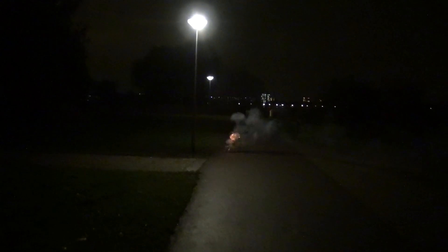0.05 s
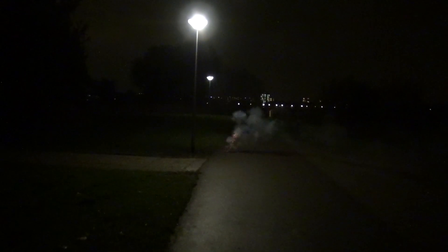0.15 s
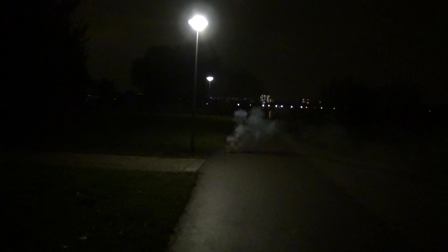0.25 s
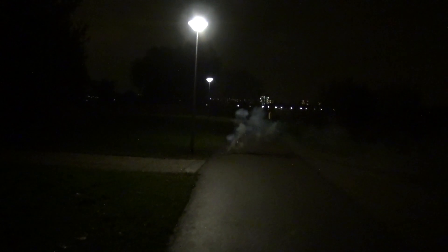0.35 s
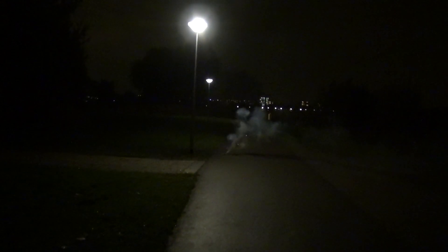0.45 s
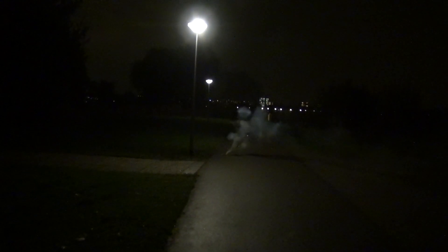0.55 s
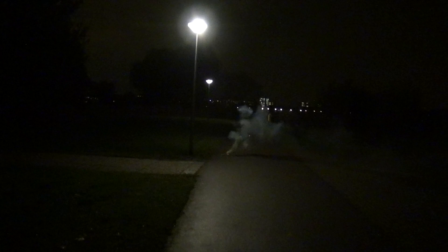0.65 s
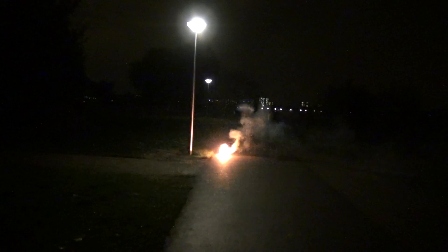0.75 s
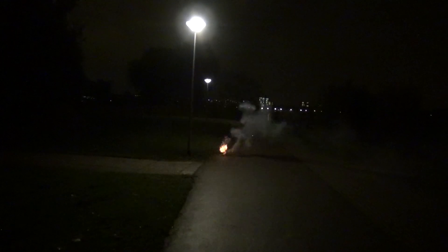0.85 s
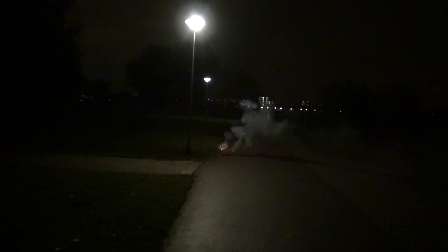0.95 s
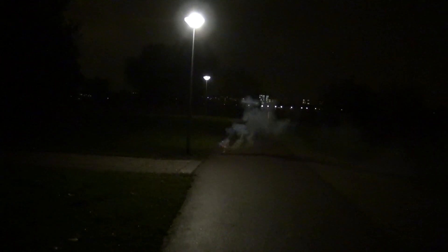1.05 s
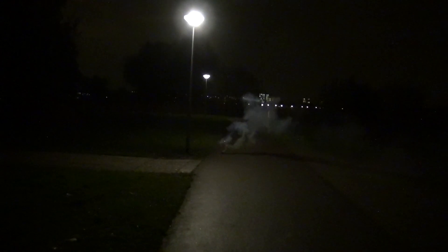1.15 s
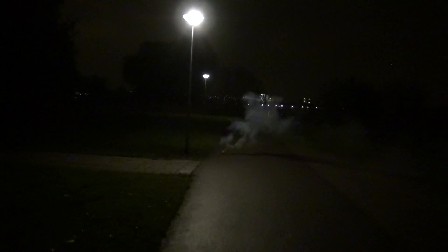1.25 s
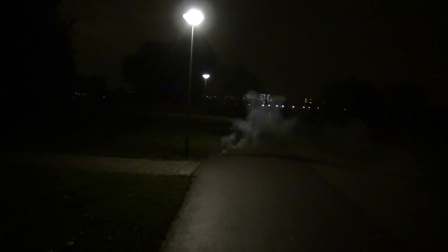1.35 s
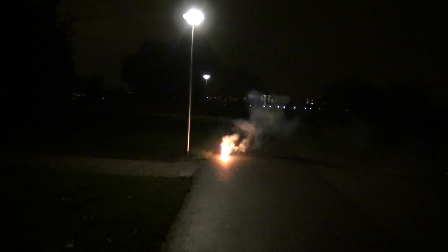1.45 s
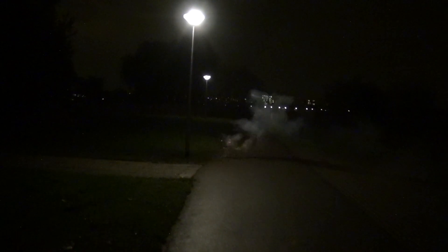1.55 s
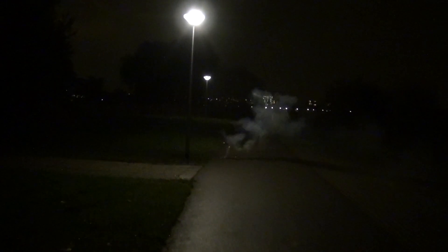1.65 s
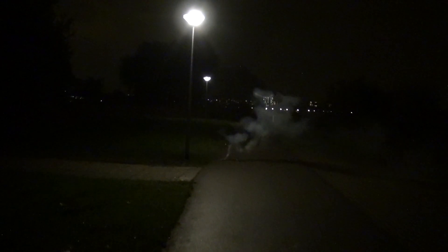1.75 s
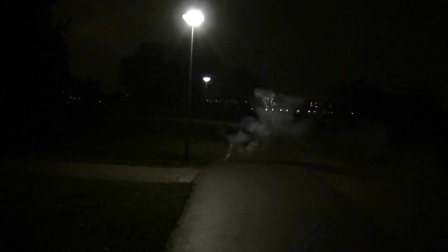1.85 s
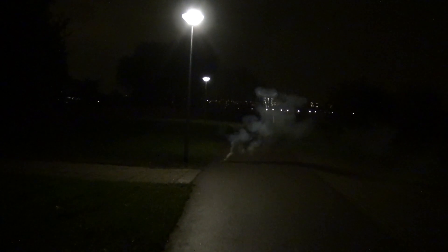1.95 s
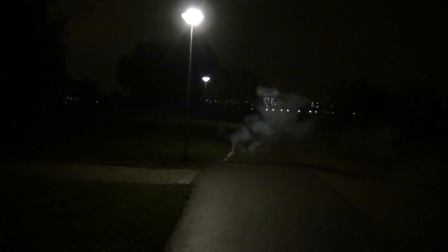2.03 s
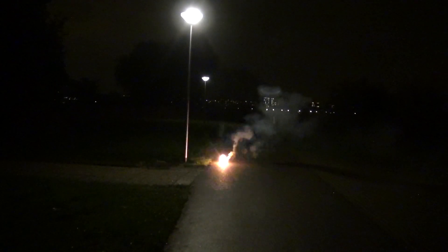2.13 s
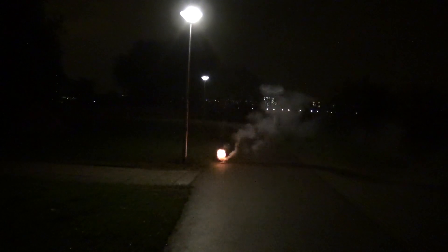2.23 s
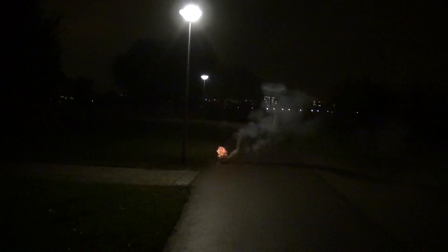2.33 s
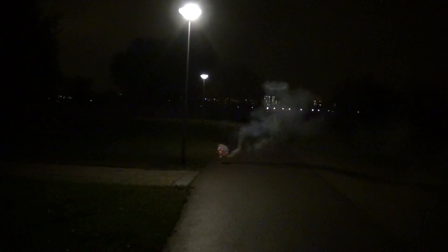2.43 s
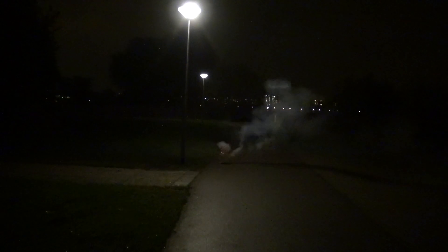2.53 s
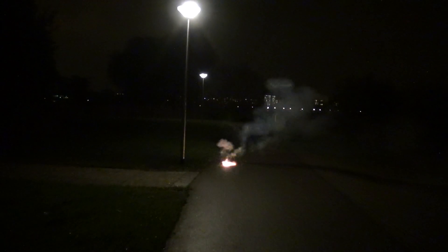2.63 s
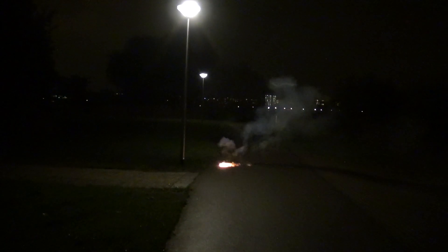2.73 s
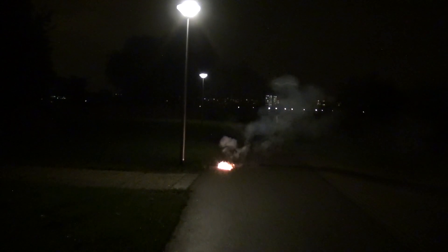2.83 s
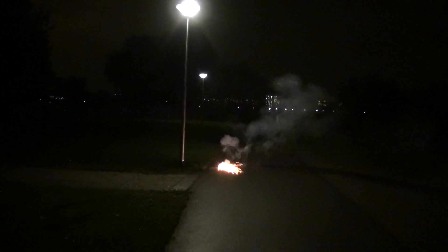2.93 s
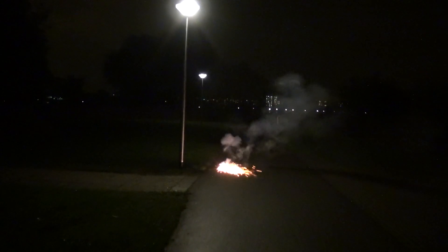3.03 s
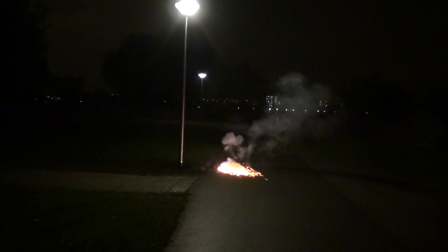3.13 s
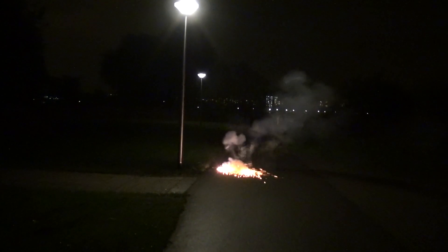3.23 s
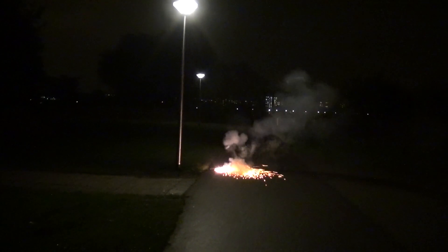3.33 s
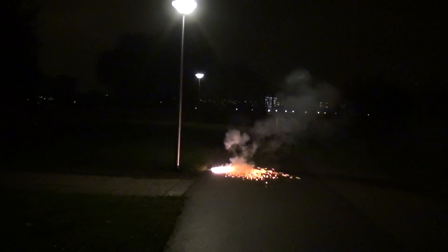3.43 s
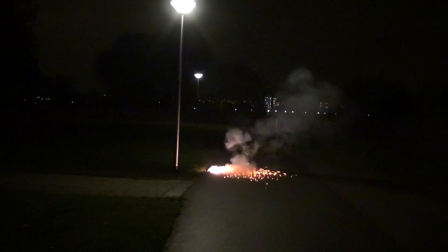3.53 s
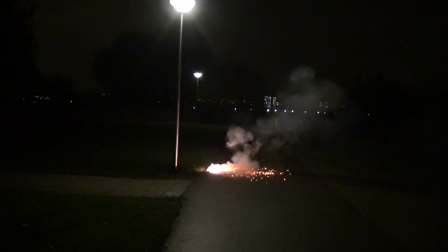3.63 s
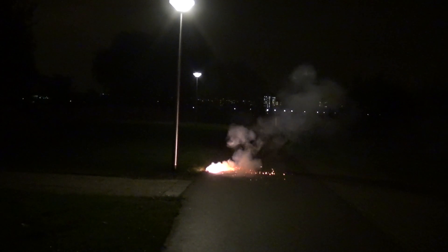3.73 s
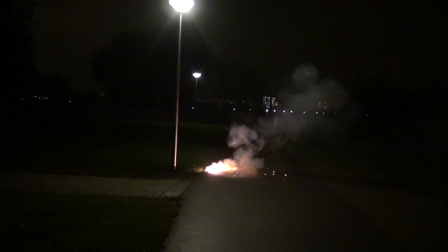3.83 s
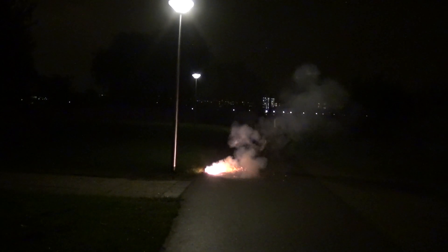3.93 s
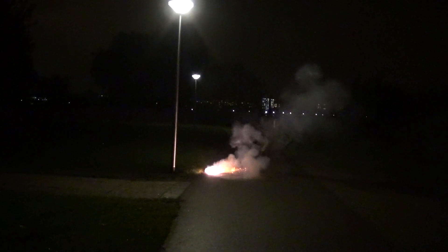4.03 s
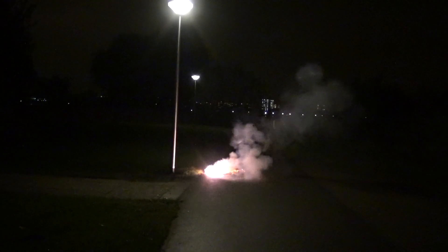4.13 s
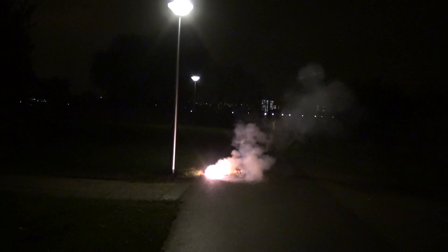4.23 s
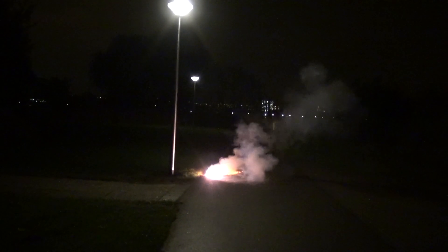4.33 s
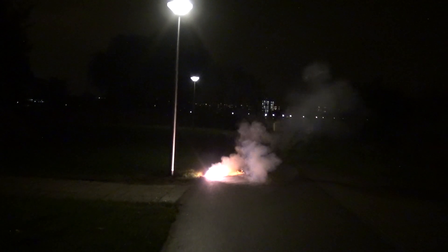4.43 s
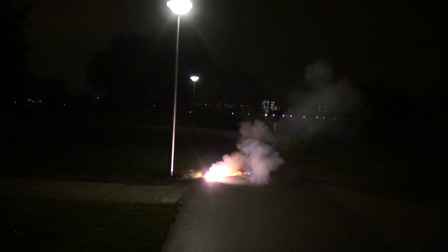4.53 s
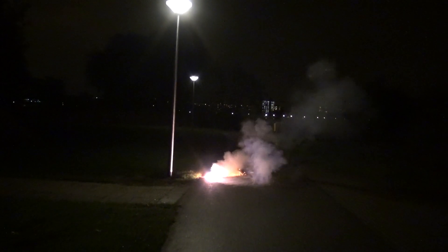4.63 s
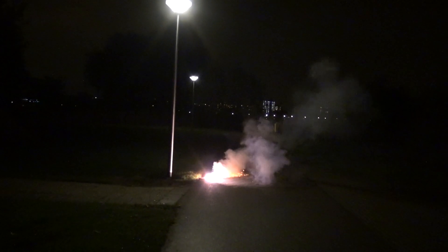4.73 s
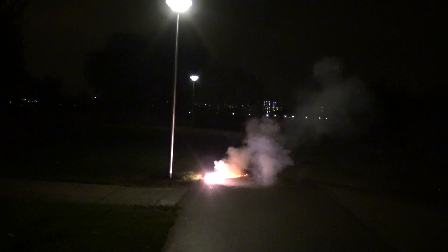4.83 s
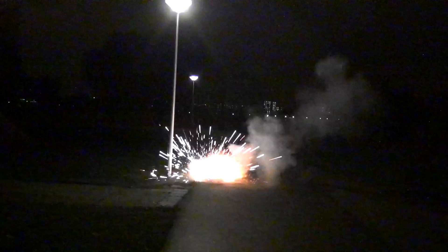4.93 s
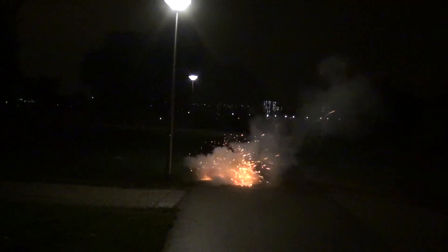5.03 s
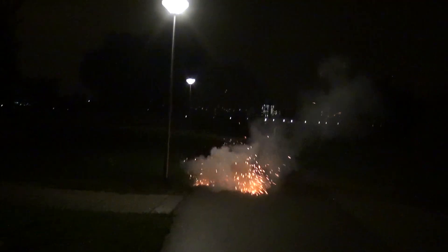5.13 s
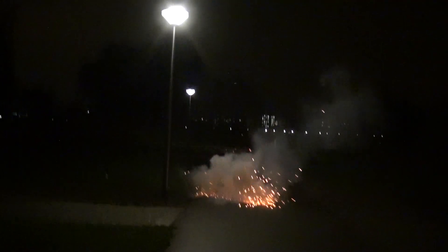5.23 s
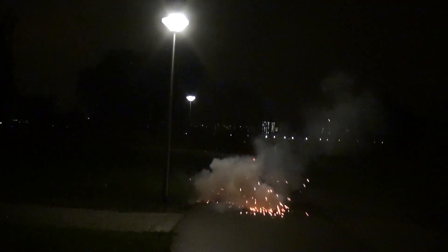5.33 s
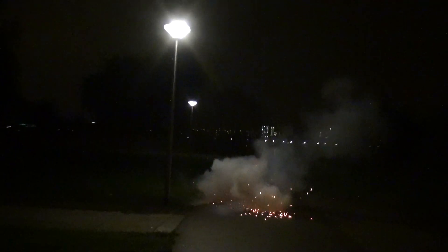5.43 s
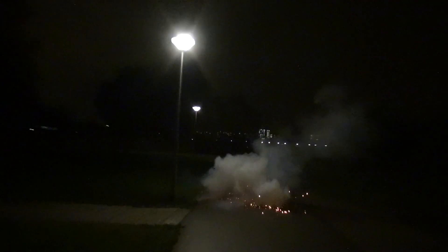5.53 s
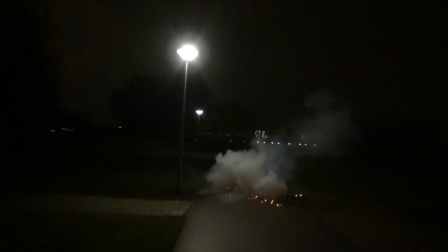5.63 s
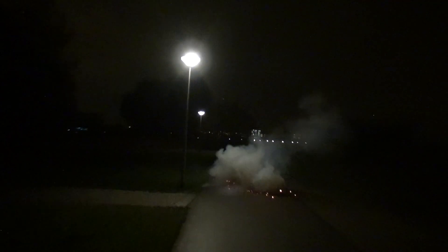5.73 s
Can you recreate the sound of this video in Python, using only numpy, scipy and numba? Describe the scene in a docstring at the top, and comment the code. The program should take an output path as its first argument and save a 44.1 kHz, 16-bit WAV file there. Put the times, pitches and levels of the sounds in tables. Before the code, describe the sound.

Firecracker on a paved path, heard from some distance by a stereo microphone. Isolated hard cracks slap off lamp posts, trees and far houses; the last lights a short roaring spray with crisp hissing sparks. The spray sinks to near silence, with tiny spits and a distant bird yelp, before one enormous distorted bang with a dense, loud, rolling reverberation fading into soft town rumble.

```python
"""Firecracker in a park at night

Sharp cracks, the first just before the start so that only its echoes are heard; a roaring spray; one huge blast.
Each bang is a pressure pulse run through echoes of lamp posts, trees and far houses; the spray is coloured noise.
A town of filtered noise hums behind, and a waterbird of falling tones calls twice in the distance.
A limiter too slow for the shock fronts lets them clip, and holds the long rolling echo of the blast at full level."""
import sys
import numpy as np
from scipy import signal
from scipy.fft import rfft, irfft, next_fast_len
from scipy.io import wavfile
from scipy.ndimage import uniform_filter1d
from numba import njit

SR = 44100
rng = np.random.default_rng(int(sys.argv[2]) if len(sys.argv) > 2 else 0)


def digitize_waveform(pressure):
    """Quantize a signal to 16-bit integers and store it at the path in sys.argv[1].

    Rows of a 2-D input are taken as channels; values are limited to [-1, 1].
    """
    field = np.atleast_2d(pressure).T
    bounded = np.clip(field, -1, 1)
    quanta = np.round(bounded * 32767).astype(np.int16)
    wavfile.write(sys.argv[1], SR, quanta)


N = 254898
T = np.arange(N) / SR

# bangs: (time [s], shock level [dB], overpressure length [ms], gas puff level [dB], casing tear level [dB])
BANGS = [(-0.0595, 23.5, 0.14, 3, -16), (0.8220, 28, 0.15, -5, -6), (1.5223, 20.5, 0.25, 15, -9),
         (2.2240, 28, 0.13, 7.5, -25), (2.7198, 14.5, 0.37, -11.5, -5), (4.9968, 53, 0.69, 50, -25)]


def undb(db):
    """Decibels to gain."""
    return 10 ** (np.asarray(db) / 20)


def butter(x, hz, kind, order=2):
    """Causal Butterworth low-pass or high-pass."""
    return signal.sosfilt(signal.butter(order, min(hz, SR * .45), kind, fs=SR, output="sos"), x)


def colour(x, points):
    """Filter by a spectrum of (frequency [Hz], level [dB]), interpolated over log frequency."""
    hz, db = np.transpose(points)
    size = next_fast_len(x.shape[-1] + 4096)
    f = np.maximum(np.fft.rfftfreq(size, 1 / SR), 1)
    gain = undb(np.interp(np.log(f), np.log(hz), db))
    return irfft(rfft(x, size) * gain, size)[..., :x.shape[-1]]


def pan(left_db):
    """Gains of the two channels for a left-minus-right level difference."""
    return undb(np.array([[left_db], [-left_db]]) / 2)


def wide_noise(size, width, bass_width=0.29, split_hz=3200):
    """Stereo white noise; close microphones hear nearly the same bass, so its side part is set apart."""
    mid, side = rng.standard_normal((2, size))
    bass_side = bass_width * butter(side, split_hz, "low", order=1)
    treble_side = width * butter(side, split_hz, "high", order=1)
    return mid + (bass_side + treble_side) * np.array([[1], [-1]])


def unit(x):
    """Scale to rms 1."""
    return x / np.sqrt(np.mean(x ** 2))


def walk(rate_hz):
    """Slow random curve of rms near 1: held random steps, smoothed over one step."""
    k = int(SR / rate_hz)
    steps = np.repeat(rng.standard_normal(N // k + 1), k)
    return unit(uniform_filter1d(steps, k)[:N])


def hump(centre_s, half_s):
    """Gaussian swell and ebb, 1 at its centre."""
    return np.exp(-((T - centre_s) / half_s) ** 2)


def add(out, x, start_s):
    """Mix x into out from a given time, cropping at both ends."""
    i = int(round(start_s * SR))
    x = x[..., max(-i, 0):out.shape[-1] - i]
    out[:, max(i, 0):max(i, 0) + x.shape[-1]] += x


def bangs(low_hz=78, front_hz=12500, puff_ms=0.58, puff_hz=380, tear_s=0.0015, tear_hz=3000,
          rattle_db=-30, rattle_s=0.0014, rattle_hz=1050):
    """The casing rips for a few ms around each shock front; the front and a slower puff of gas run through the park."""
    out, t = np.zeros((2, N)), T[:SR // 10]
    for start_s, db, push_ms, puff_db, tear_db in BANGS:
        shock = undb(db) * butter(blast_wave(push_ms), front_hz, "low", order=1)
        puff = undb(puff_db) * butter(blast_wave(puff_ms), puff_hz, "low")
        wave = butter(shock + puff, low_hz, "high", order=3)  # the deepest bass swings out slowly
        paths = park()
        # the paving around the cracker throws the front back within the first few ms
        rattle = butter(butter(rng.standard_normal(len(t)), rattle_hz, "low"), 257, "high")
        add(paths, undb(rattle_db) * unit(rattle) * np.exp(-t / rattle_s), 0)
        add(out, signal.fftconvolve(paths, wave[None]), start_s)
        tear = butter(butter(rng.standard_normal(len(t)), tear_hz, "low", order=1), 290, "high")
        middle_s = t[-1] / 2
        tear_envelope = np.exp(-abs(t - middle_s) / tear_s)
        add(out, undb(tear_db) * unit(tear) * tear_envelope, start_s - middle_s)
    return out


def blast_wave(push_ms):
    """A jump in pressure that falls through zero into a longer, weaker suction."""
    age = T[:SR // 10] * 1000 / push_ms
    return (1 - age) * np.exp(-age)


def park(mirror=0.84, patchy_db=1.5, echo_top_hz=5000, air_db_per_s=1.0, air_power=1.367):
    """Stereo response of the park: direct path, posts, smeared echoes and scatter, all but the direct dulled by air."""
    # lamp posts and path furniture: (lag [s], level [dB], highest reflected frequency [Hz])
    posts = [(.0033, -23, 9000), (0.0119, -16.5, 14100), (0.014, -27.5, 2200), (0.0226, -19.5, 3000)]
    # trunks and walls: (lag [s], level [dB], smear [ms], left minus right [dB], bass along the ground [dB])
    trunks = [(.036, -42, 4, -17, -15), (.0455, -23, 3, 16.5, -44), (0.0787, -26, 2.1, 2, -16.5),
              (0.084, -16.5, 2.6, 7, -5.5), (.146, -26, 7, 6.5, -36), (0.183, -25, 5.5, 5.5, -37),
              (.336, -67, 10, -15, -31.5)]
    # colour of the scatter, low mids cancelled by soft ground: (frequency [Hz], level [dB])
    grass = [(35, 2), (75, 10), (120, 3.5), (190, 2), (270, -4), (390, -3.5), (700, -1), (1400, 0.5),
             (2600, 2), (4500, 0), (8000, 2), (15000, -5)]
    # faces mirror mids and treble; the bass comes back as a thump
    echo_low_hz, thump_low_hz, thump_high_hz = 370, 122, 248
    roll_s, roll_lag_s = 0.024, 0.47  # from roll_lag_s on, the bass of an echo is more roll than thump
    size = int(1.2 * SR)
    t, click = T[:size], signal.unit_impulse(2048)

    # some twigs and trunks return far more than others
    swell = scatter_level(t) * undb(patchy_db * walk(500)[:size])
    paths = colour(wide_noise(size, echo_width(t)) * swell, grass) * pan(4)
    for lag_s, db, smear_ms, left_db, bass_db in trunks + houses():
        # a flat face mirrors the shock; the rough things around it smear it
        echo = (smear(lag_s, smear_ms / 1000) + mirror * click) / np.hypot(1, mirror)
        echo = butter(butter(echo, echo_low_hz, "high"), echo_top_hz, "low", order=1)
        thump = click + smear(lag_s, roll_s) * lag_s / roll_lag_s
        thump = butter(butter(thump, thump_low_hz, "high", order=3), thump_high_hz, "low", order=3)
        add(paths, (echo * undb(db) + thump * undb(bass_db)) * pan(left_db), lag_s)
    for lag_s, db, top_hz in posts:
        post = butter(butter(click, 790, "high", order=1), top_hz, "low", order=1)
        add(paths, undb(db) * post, lag_s)

    # air absorption: air_db_per_s at 1 kHz, growing as a power of frequency
    f, lags, spectra = signal.stft(paths, SR, nperseg=256)
    loss_db = air_db_per_s * np.outer((f / 1000) ** air_power, lags)
    paths = signal.istft(spectra * undb(-loss_db), SR)[1][:, :size]
    paths[:, 0] += 1  # direct path
    return paths


def scatter_level(t, rise_s=0.0051):
    """Each grove sets in when the shock reaches it, then fades at its own rate; powers add."""
    # lawn, near trees, far trees: (lag [s], level [dB], fade [dB/s])
    groves = [(0, -42.5, 494), (0.033, -46, 88), (0.312, -68, 47)]
    power = 0
    for lag_s, db, fade_db_per_s in groves:
        age = np.maximum(t - lag_s, 0)
        level = undb(db - fade_db_per_s * age) * (1 - np.exp(-age / rise_s))
        power = power + level ** 2
    return np.sqrt(power)


def houses(count=10, lag_s=.3595, step_s=.034, smear_ms=7.6, left_db=2.5,
           db=-34, step_db=-2.5, bass_db=-30, bass_step_db=-3.5):
    """Echoes of a far row of evenly spaced fronts, each later and weaker; same columns as trunks and walls."""
    return [(lag_s + k * step_s, db + k * step_db, smear_ms, left_db, bass_db + k * bass_step_db)
            for k in range(count)]


def echo_width(lag_s, width=1.0, narrow_s=0.12):
    """Stereo width by lag: near echoes come from all round, late ones from down the path."""
    return width / np.hypot(1, lag_s / narrow_s)


def smear(lag_s, fade_s):
    """A stereo burst of fading noise with the energy of one click."""
    t = T[:2048]
    rough = wide_noise(len(t), echo_width(lag_s)) * np.exp(-t / fade_s)
    return rough / np.sqrt(np.sum(rough ** 2) / 2)


def spray(flutter_db=1.28, sputter_db=0.9, flare_db=-34, flare_growth=2.6):
    """A fluttering jet of burning gas builds, then collapses to a smoulder; sparks hiss and spit on top."""
    # roar of the jet: (frequency [Hz], level [dB])
    roar_band = [(47, -30), (80, -8.5), (190, 0.5), (420, 1), (680, 0.5), (1250, -2.5), (2400, -14),
                 (4500, -27), (9000, -70)]
    # hiss of the sparks: (frequency [Hz], level [dB])
    hiss_band = [(1200, -29), (2800, -17), (5000, 6), (8000, 3.5), (11000, -1.5), (15500, -13)]
    # rasp of a strong spray: (frequency [Hz], level [dB])
    flare_band = [(900, -35), (2000, 2), (3200, 5), (5000, -2.5), (12000, -19)]
    # bursts of extra sparks: (time [s], half length [s], hiss level [dB])
    flare_ups = [(3.01, 0.08, -46), (3.354, 0.13, -43.5), (4.3, .06, -56)]
    # single sparks that spit: (time [s], level before a 3.5 dB cut and a high-pass [dB])
    spits = [(4.1007, -26), (4.708, -25.5)]
    light_s, spent_s, blast_s = 2.73, 3.359, BANGS[-1][0]
    jet_db, jet_growth, collapse_db_per_s = -23, 0.59, 73
    jet_hiss_db = -24.5  # relative to the jet
    smoulder_db, smoulder_hiss_db = -41.5, -56.5

    burning = np.interp(T, [light_s, light_s + .03, blast_s, blast_s + .01], [0, 1, 1, 0])
    burnt = np.clip((T - light_s) / (spent_s - light_s), 0, 1)
    jet = burnt ** jet_growth * undb(jet_db - collapse_db_per_s * np.maximum(T - spent_s, 0))
    roar = unit(colour(wide_noise(N, 0.21, bass_width=0.051), roar_band))
    roar = roar * np.hypot(jet, undb(smoulder_db)) * undb(flutter_db * walk(70))

    extra = sum(undb(db) * hump(centre_s, half_s) for centre_s, half_s, db in flare_ups)
    sparks = np.sqrt((jet * undb(jet_hiss_db)) ** 2 + extra ** 2 + undb(smoulder_hiss_db) ** 2)
    sputter = undb(sputter_db * walk(400))
    hiss = unit(colour(wide_noise(N, 0.18), hiss_band)) * sparks * sputter
    # a strong spray rasps lower as well as louder
    flare_level = undb(flare_db) * (sputter * sparks / sparks.max()) ** flare_growth
    flare = unit(colour(wide_noise(N, 0.083), flare_band)) * flare_level
    out = (roar + hiss + flare) * burning * pan(0.17)

    for start_s, db in spits:
        spit = wide_noise(SR // 20, 0.32) * np.exp(-T[:SR // 20] / 0.00084)
        add(out, undb(db - 3.5) * butter(spit, 4000, "high"), start_s)
    return out


def bird(fall=.22, glide_s=0.055, rasp=0.033, octave_db=-18, wet_db=-5, ring_s=0.06):
    """A waterbird's short yelp: a falling tone and its octave, hoarse by pitch jitter, blurred by the trees."""
    # calls: (time [s], level [dB], starting pitch [Hz])
    calls = [(1.036, -36.5, 1685), (4.21, -34.5, 1736)]
    out, t = np.zeros((2, N)), T[:SR // 4]
    opening = np.interp(t, [0, .018, .055, .09], [0, 1, .8, 0])
    for start_s, db, hz in calls:
        glide = 1 - fall * (1 - np.exp(-t / glide_s))
        pitch_hz = hz * glide * (1 + rasp * walk(400)[:len(t)])
        phase = 2 * np.pi * np.cumsum(pitch_hz) / SR
        call = (np.sin(phase) + undb(octave_db) * np.sin(2 * phase)) * opening
        trees = wide_noise(len(t), 0.75) * np.exp(-t / ring_s)
        trees *= undb(wet_db) / np.sqrt(np.sum(trees ** 2) / 2)
        trees[:, 0] += 1  # direct path
        add(out, undb(db) * signal.fftconvolve(trees, call[None]), start_s)
    return out


def town(wash_db=-40, sway_db=0.5, drone_db=-54, pass_db=-47.5, pass_s=2.06, pass_half_s=0.37):
    """Far traffic: a gently swaying wash and a low drone that swells once as a vehicle goes by."""
    # wash: (frequency [Hz], level [dB])
    wash_band = [(12, -29), (20, 0), (65, -4.5), (98, -2), (130, -7.5), (198, -5.5), (248, -11),
                 (357, -16.5), (422, -17), (759, -13), (825, -27), (949, -15), (4810, -37.5), (16000, -45)]
    # drone: (frequency [Hz], level [dB])
    drone_band = [(60, -20), (105, -8.5), (125, 5), (170, -10.5), (300, -23), (1000, -63)]
    wash = unit(colour(wide_noise(N, 0.88, bass_width=0.6), wash_band))
    wash = wash * undb(wash_db + sway_db * walk(4.95))
    drone_level = undb(drone_db) + undb(pass_db) * hump(pass_s, pass_half_s)
    drone = unit(colour(wide_noise(N, .3), drone_band)) * drone_level
    return wash + drone


def scene():
    """Everything that reaches the microphones."""
    return bangs() + spray() + bird() + town()


@njit
def limiter(x, top, attack_db, release):
    """The gain falls by attack_db a sample while the output is over top, and recovers faster the deeper it fell."""
    y, cut_db = np.empty_like(x), 0.
    for i in range(x.shape[1]):
        y[:, i] = x[:, i] * 10 ** (-cut_db / 20)
        over = max(abs(y[0, i]), abs(y[1, i])) > top
        cut_db = cut_db + attack_db if over else max(cut_db - release * (cut_db + 10), 0.)
    return y


def record(dry, top=0.72, attack_db_per_s=4500, release_s=0.17, top_hz=15900):
    """The limiter is too slow for the shock fronts, so they clip flat; then the treble above top_hz is cut."""
    held = limiter(np.ascontiguousarray(dry), float(top), attack_db_per_s / SR, 1 / (release_s * SR))
    treble_cut = signal.ellip(8, .2, 70, top_hz, fs=SR, output="sos")
    return signal.sosfilt(treble_cut, np.clip(held, -1, 1))


dry = scene()
out = record(dry)
digitize_waveform(out)
```